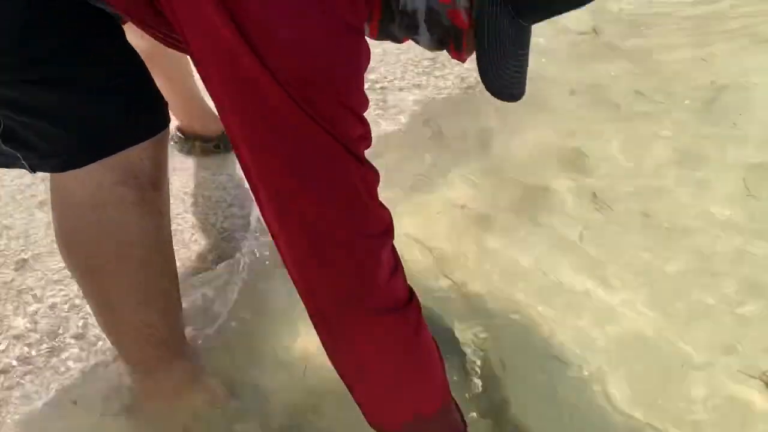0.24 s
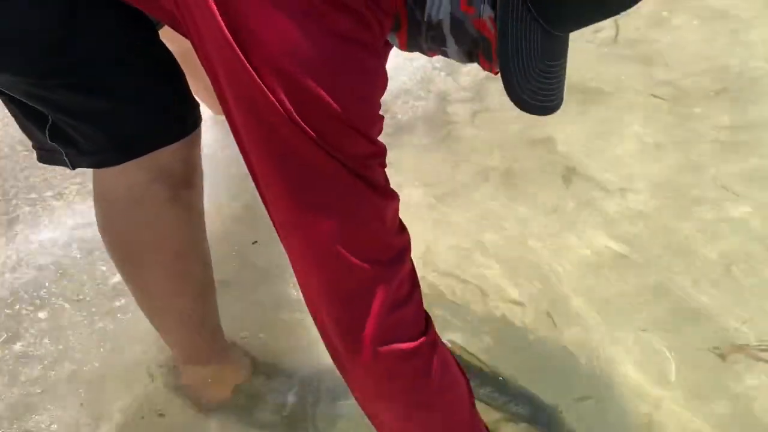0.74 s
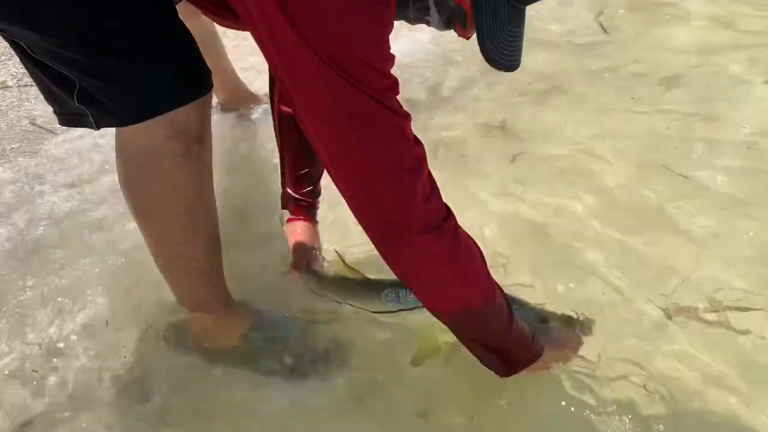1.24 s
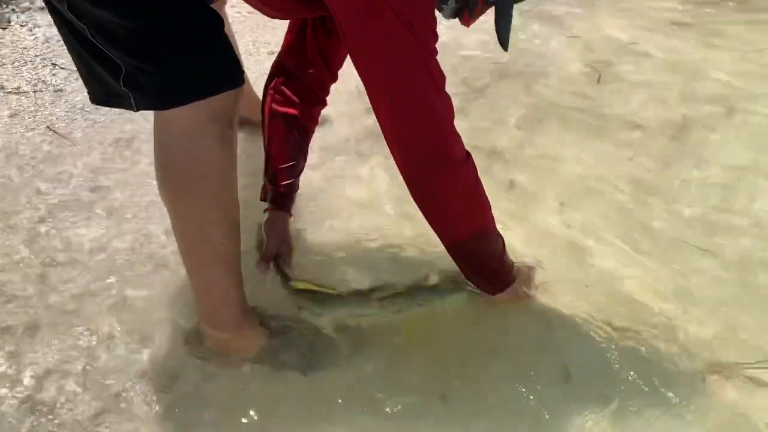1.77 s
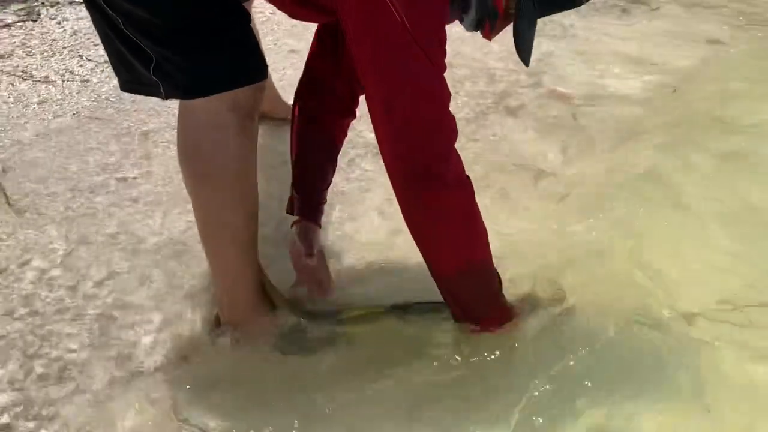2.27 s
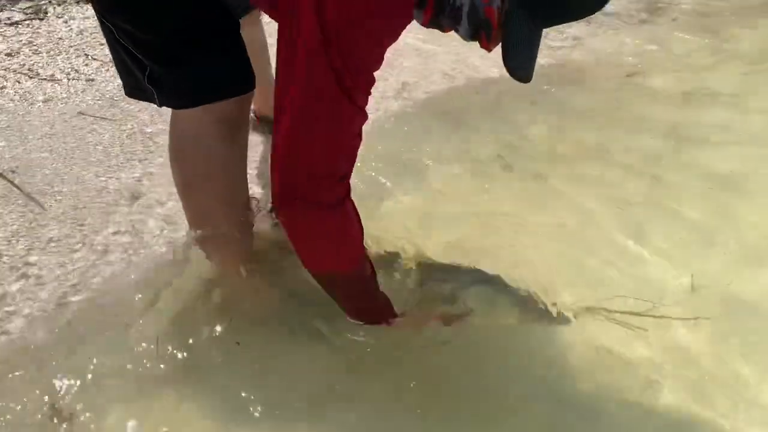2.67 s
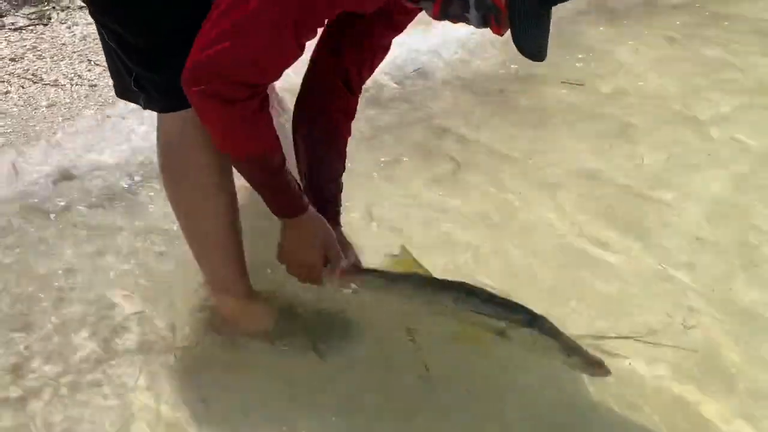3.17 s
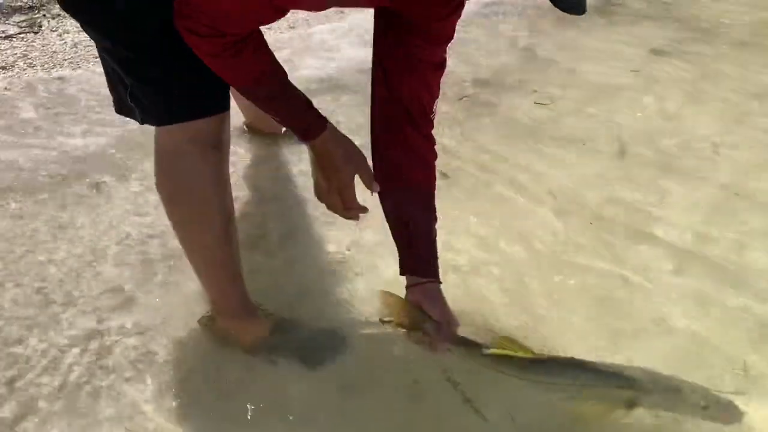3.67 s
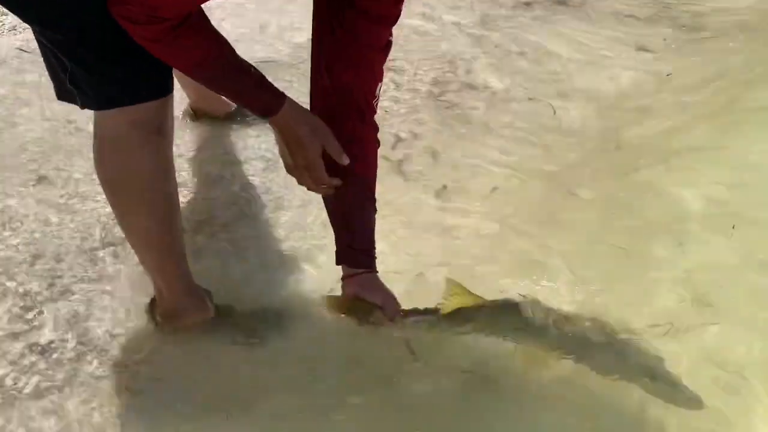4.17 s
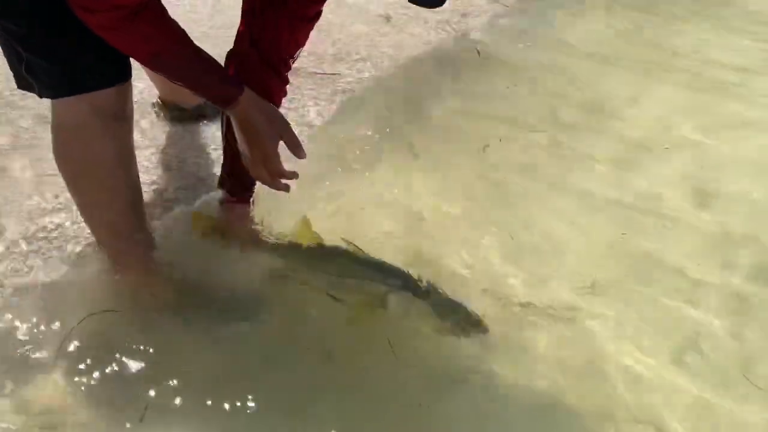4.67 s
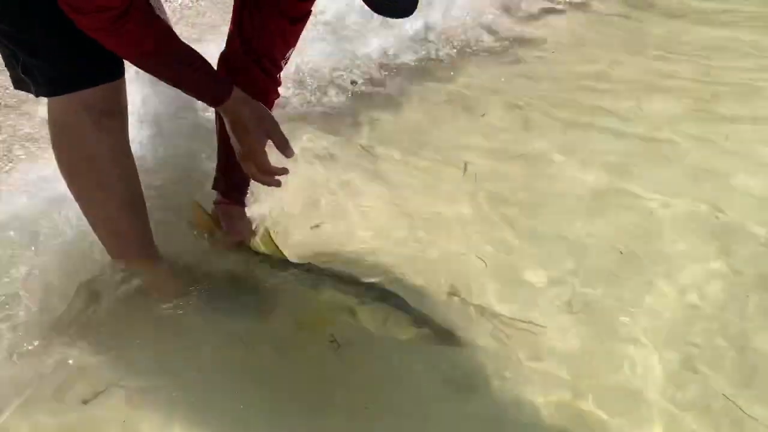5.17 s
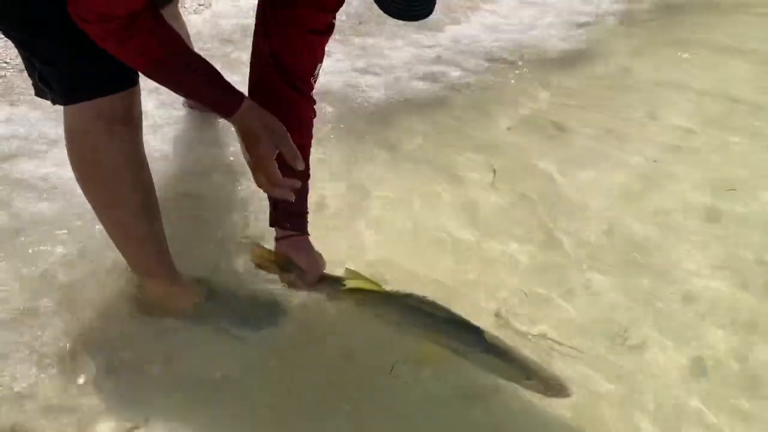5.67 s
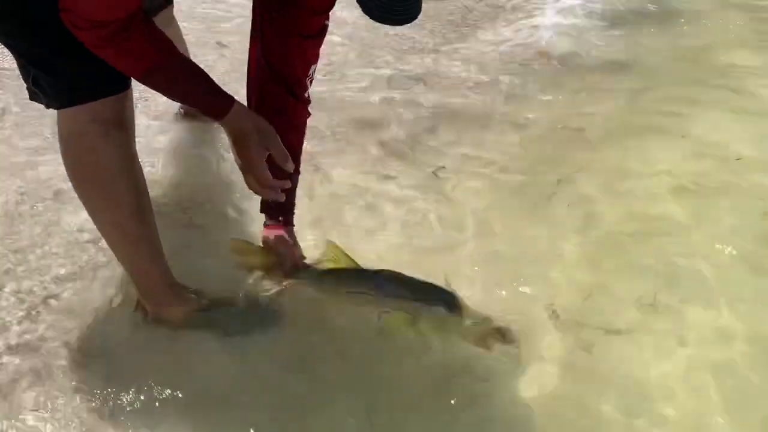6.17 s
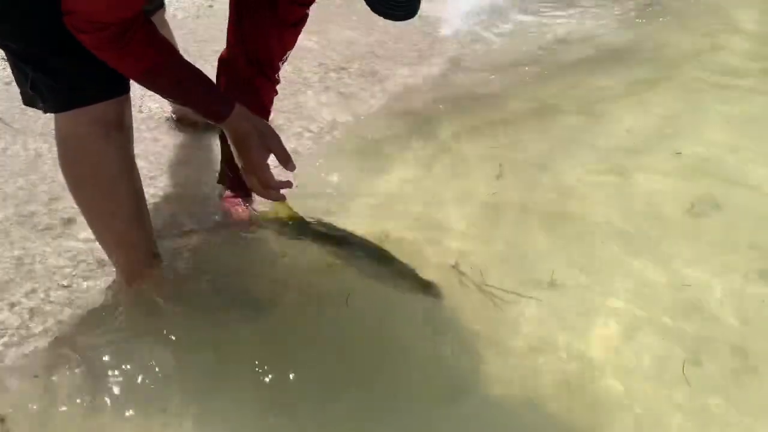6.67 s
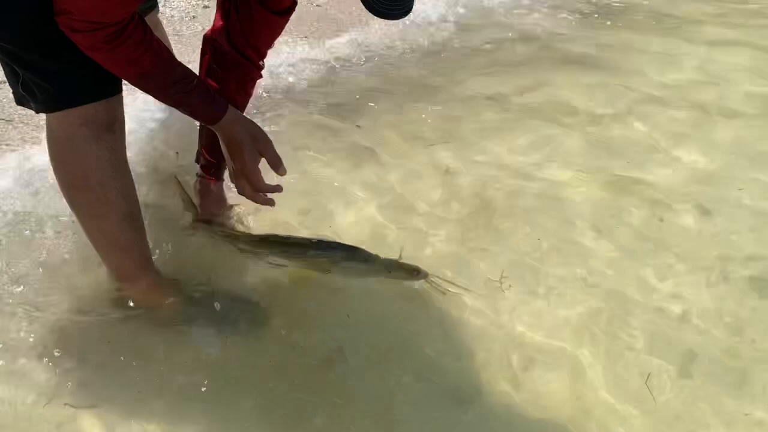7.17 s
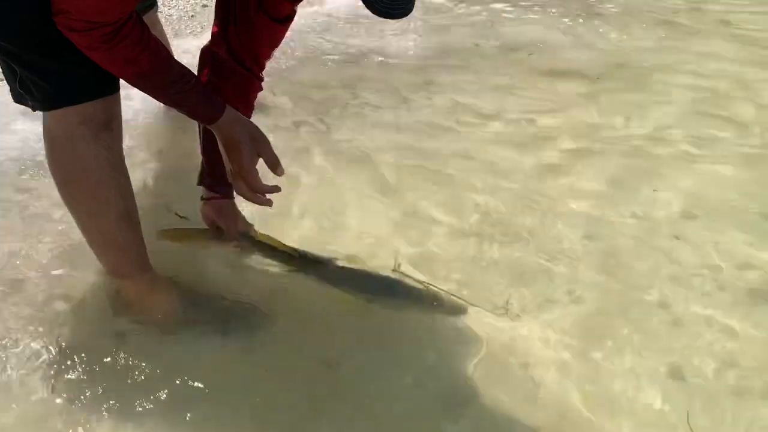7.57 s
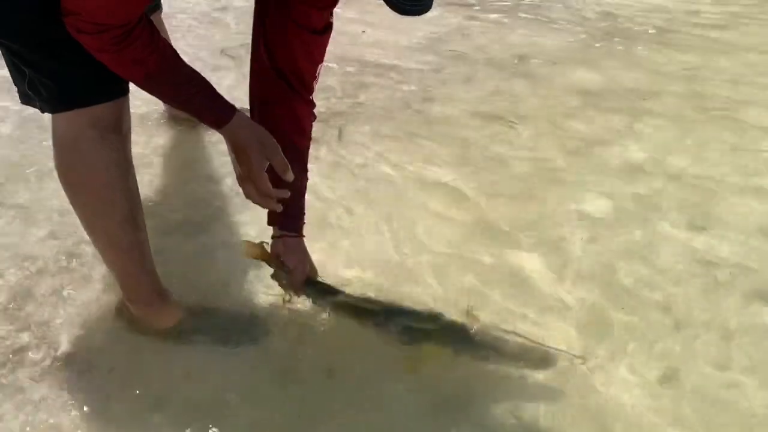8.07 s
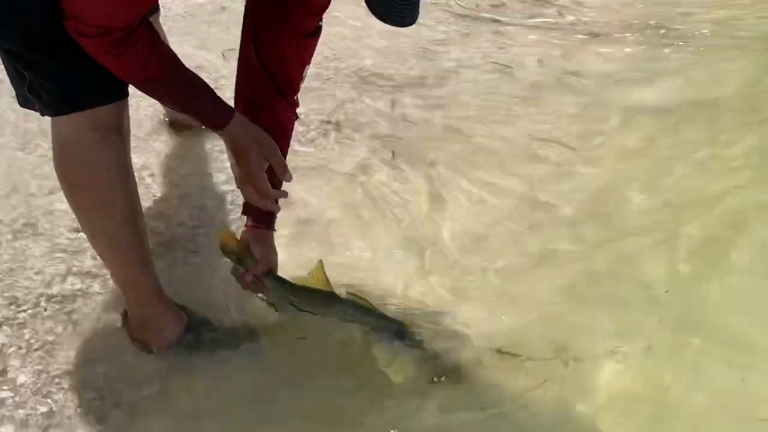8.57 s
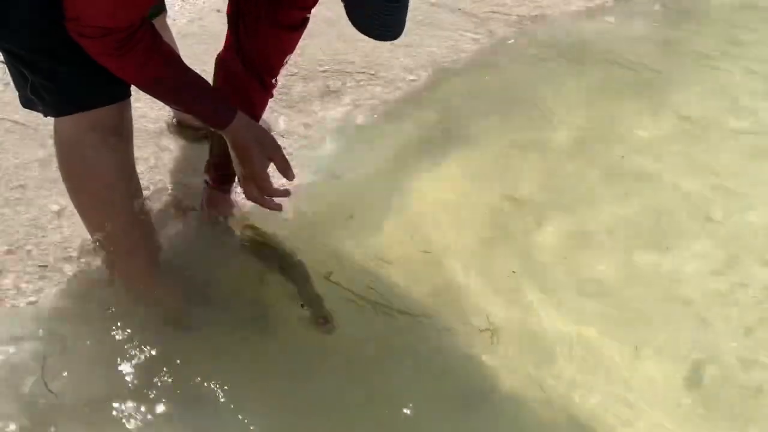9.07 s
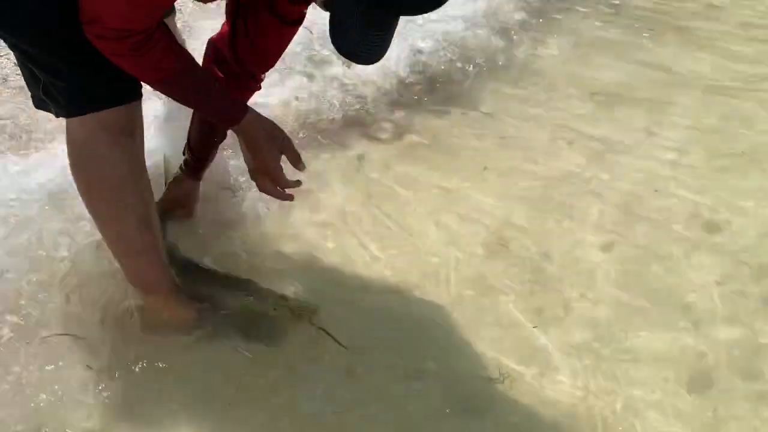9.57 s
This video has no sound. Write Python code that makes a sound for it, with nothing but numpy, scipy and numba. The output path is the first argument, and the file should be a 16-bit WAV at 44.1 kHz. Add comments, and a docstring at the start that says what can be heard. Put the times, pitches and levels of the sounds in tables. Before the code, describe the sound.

Small waves fold, gurgle and fizz up a sandy shore, sliding back in trickles, with low wind buffeting and a faint far motor hum.

```python
"""A sandy beach, heard from ankle-deep water: a far motor hums as a wavering sine over a drone. More surf along
the shore and wind on the microphone are coloured noise with random levels. Small waves fold over, wash up the
sand to the left, fizz as foam and slide back: clouds of ringing bubbles, the foam with added hiss. Single
bubbles plink and glug, drops tick, small waves slap a leg, water stirred by a moving arm sounds in narrow
bubbly bands that drift down in pitch."""
import sys
import numpy as np
from scipy import signal
from scipy.fft import rfft, irfft, next_fast_len
from scipy.io import wavfile
from scipy.ndimage import uniform_filter1d, map_coordinates
from numba import njit

SR = 44100
rng = np.random.default_rng(int(sys.argv[2]) if len(sys.argv) > 2 else 0)


def log_audio(samples):
    """Write samples as a 16-bit WAV file to the path given in sys.argv[1]."""
    # one column per channel
    frames = np.atleast_2d(samples).T
    # limit to full scale, then quantise
    limited = np.clip(frames, -1, 1)
    pcm = np.round(limited * 32767).astype(np.int16)
    wavfile.write(sys.argv[1], SR, pcm)


N = 433944
TIME = np.arange(N) / SR
FFT_SIZE = next_fast_len(N, True)
FREQ = np.fft.rfftfreq(FFT_SIZE, 1 / SR)
PORT_LAG_S = 13 / SR  # left channel late, for foam and drop splats


def undb(db):
    """Decibels to gain."""
    return 10 ** (np.asarray(db) / 20)


def together(*levels_db):
    """Power sum of unrelated sounds, in dB."""
    return 10 * np.log10(sum(undb(db) ** 2 for db in levels_db))


def swells(rows):
    """Level in dB of bell-shaped swells, each given as (middle s, half length s, dB)."""
    levels_db = [-100]
    for middle_s, half_s, db in rows:
        levels_db.append(db - 10 * np.log10(np.e) * ((TIME - middle_s) / half_s) ** 2)
    return together(*levels_db)


def surges(rows):
    """Level in dB of surges that rise evenly, hold and die away: (start s, rise s, hold s, decay s, dB)."""
    power = 1e-10
    for start_s, rise_s, hold_s, decay_s, db in rows:
        age_s = TIME - start_s
        attack = np.clip(age_s / rise_s, 0, 1)
        decay = np.exp(-np.maximum(age_s - rise_s - hold_s, 0) / decay_s)
        power = power + (undb(db) * attack * decay) ** 2
    return 10 * np.log10(power)


def curves(table):
    """Table columns joined by straight lines in time."""
    s, *columns = np.transpose(table)
    return [np.interp(TIME, s, column) for column in columns]


def walk(rate_hz):
    """Random levels held 1 / rate_hz seconds and slewed twice; spread near 1."""
    hold = int(SR / rate_hz)
    steps = np.repeat(rng.standard_normal(N // hold + 1), hold)
    smooth = uniform_filter1d(uniform_filter1d(steps, hold), hold)
    return np.sqrt(2) * smooth[:N]


def unit(x):
    """Scale to rms 1."""
    return x / np.sqrt(np.mean(x ** 2))


def noise(side_db):
    """White stereo noise at rms 1; side_db sets its width."""
    mid, side = rng.standard_normal((2, N))
    return unit(mid + undb(side_db) * side * np.array([[1], [-1]]))


def pan(db):
    """Channel gains for a left minus right level, steady or moving."""
    return undb(np.reshape([db, -db], (2, -1)) / 2)


def colour(x, points, lag_s=0):
    """Filter two channels by a spectrum curve and scale to rms 1; the left one comes lag_s late."""
    hz, db = np.transpose(points)
    spectrum = rfft(x, FFT_SIZE) * undb(np.interp(np.log(FREQ + 1), np.log(hz), db))
    if lag_s:
        spectrum[0] *= np.exp(-2j * np.pi * FREQ * lag_s)
    return unit(irfft(spectrum, FFT_SIZE)[:, :N])


@njit
def ring(start_s, hz, cycles, size, lag_s, glide):
    """Damped sines whose pitch rises by the share glide; each reaches the right channel lag_s late."""
    out = np.zeros((2, N))
    for k in range(len(start_s)):
        length = int(cycles[k] * SR / hz[k]) + 2
        turn = 2 * np.pi * hz[k] / SR
        bend = np.exp(1j * turn * glide / length)
        for c in range(2):
            first = max(int((start_s[k] + c * lag_s[k]) * SR), 0)
            z = size[k] + 0j
            step = np.exp(1j * turn - 5 / length)
            for i in range(first, min(first + length, N)):
                out[c, i] += z.imag
                z *= step
                step *= bend
    return out


PATCHES_PER_S, PATCHES_PER_OCTAVE = 22, 6


def patchiness(seconds, hz):
    """Random patchiness of bubble strength over time and pitch; spread near 1."""
    grid = rng.standard_normal((512, 128))
    place = [seconds * PATCHES_PER_S, np.log2(hz) * PATCHES_PER_OCTAVE]
    return map_coordinates(grid, place, order=1, mode="wrap") * 1.5


def bubbles(count, lo_hz, hi_hz, cycles, spread_db, lag_ms, scatter_ms, glide, patch_db=0):
    """Bubbles of many sizes, equally strong per Hz, scattered around a direction that may move; rms 1."""
    when, pitch, life, strength, place = rng.random((count, 5)).T
    start_s = when * N / SR
    hz = lo_hz + (hi_hz - lo_hz) * pitch
    size_db = patch_db * patchiness(start_s, hz) - spread_db * np.log(strength + 0.012)
    index = (when * N).astype(int)
    centre_ms = np.broadcast_to(lag_ms, N)[index]
    reach_ms = np.broadcast_to(scatter_ms, N)[index]
    lag_s = (centre_ms + reach_ms * (2 * place - 1)) / 1000
    return unit(ring(start_s, hz, cycles * (.5 + life), np.sqrt(hz) * undb(size_db), lag_s, float(glide)))


def swarm(rows, octaves, cycles, spread_db, lag_ms, scatter_ms, octaves_per_s, count):
    """Bubbles crowd around a moment and a pitch, for each (middle s, half length s, Hz, dB at the middle)."""
    out = 0
    for middle_s, half_s, hz, db in rows:
        when, pitch, strength, place = np.clip(rng.standard_normal((count, 4)).T, -2.5, 2.5)
        late_s = when * half_s / np.sqrt(2)
        octave = octaves * pitch + octaves_per_s * late_s
        size = undb(spread_db * np.minimum(strength, 1))
        lag_s = (lag_ms + scatter_ms * place) / 1000
        life = cycles * (.5 + rng.random(count))
        cloud = ring(middle_s + late_s, hz * 2 ** octave, life, size, lag_s, 0.16)
        share = np.mean(np.exp(-((TIME - middle_s) / half_s) ** 2))  # of the scene filled by the swarm
        out = out + unit(cloud) * undb(db) * np.sqrt(share)
    return out


# Far motor. Each row: time in seconds, pitch in Hz before wavering, relative level in dB.
MOTOR_NOTE = [(0, 138, -32), (.5, 151, -48), (.85, 129, -33), (1.08, 132, -33.5), (1.35, 143, -35.5),
              (2.15, 140, -58), (2.38, 139, -32), (2.6, 136, -36), (3.1, 137, -38.5), (3.95, 146, -46.5),
              (4.2, 143, -34), (4.5, 135, -38), (5.25, 128, -42), (5.6, 121, -33), (6.05, 123, -50),
              (6.55, 134, -36.5), (7.05, 133, -41), (8.25, 148, -51), (8.62, 145, -36.5), (9.05, 149, -45),
              (9.84, 135, -35)]


def motor():
    """A far motor: a sine whose pitch wavers with the load, over a faint drone near 75 Hz."""
    hz, db = curves(MOTOR_NOTE)
    phase = 2 * np.pi * np.cumsum(hz * (1 + 0.0241 * walk(22))) / SR
    right_lead_rad = np.array([[0], [.5]])
    note = np.sin(phase + right_lead_rad) * undb(db + 1.0 + 2.0 * walk(11))
    drone_phase = 2 * np.pi * np.cumsum(75 * (1 + 0.0155 * walk(6.3))) / SR
    drone = np.sin(drone_phase) * undb(-44.0 + 2 * walk(1.4))
    return note + drone


# Surf spectrum. Each row: frequency in Hz, relative density in dB per Hz.
SURF_SPECTRUM = [(80, 4), (160, 1), (300, 3), (420, -2.5), (560, 2.5), (730, -14), (850, -4), (950, 3.5),
                 (1130, -1.5), (1450, -1.5), (1900, -4.5), (2400, -12), (4000, -42), (8000, -78)]


def surf():
    """Wavelets further along the shore to the right merge into wide, soft, hollow noise."""
    rush = colour(noise(side_db=-4.0), SURF_SPECTRUM, lag_s=0.00028)
    return rush * undb(-39.5 + 0.36 * walk(1.06) + 1.0 * walk(9.9))


BREEZE_DB = -34  # relative, as the gusts
# Gusts over the breeze. Each row: middle in seconds, half length in seconds, relative level in dB.
GUST_SWELLS = [(.3, 0.29, -33.5), (1.86, 0.052, -29), (2.3, 0.18, -36), (4.33, 0.15, -35),
               (5.88, 0.11, -33), (8.03, 0.13, -35), (9.33, 0.21, -30.5)]
# Single eddies striking the microphone. Each row: start in seconds, relative peak in dB.
EDDIES = [(0.189, -26), (1.672, -23), (1.822, -22), (3.475, -27.5), (3.868, -24), (4.372, -23.5),
          (4.785, -20), (5.028, -21), (5.12, -22), (6.5, -29), (7.031, -20), (7.409, -19.5), (7.548, -22),
          (9.08, -19), (9.15, -20), (9.233, -15), (9.558, -19)]
# Wind spectrum. Each row: frequency in Hz, relative density in dB per Hz.
WIND_SPECTRUM = [(20, -38), (35, -23), (52, -4), (72, -2), (120, -1), (200, -5.5), (300, -14.5),
                 (600, -21.5), (1500, -72)]


def wind():
    """Turbulence rumbles on the microphone: low noise that swells with gusts and briefly with each eddy."""
    wind_db = together(BREEZE_DB, swells(GUST_SWELLS))
    steady = undb(wind_db - 1.1 + 1.36 * walk(15))
    eddies = 0
    for start_s, peak_db in EDDIES:
        age = np.clip((TIME - start_s) / 0.013, 0, 20)  # peaks at 1, 13 ms after the start
        eddies = eddies + undb(peak_db - 3.0) * age * np.exp(1 - age)
    return colour(noise(side_db=-19.5), WIND_SPECTRUM) * pan(-2.0) * np.hypot(steady, eddies)


def trickle(wash_db):
    """Ripples around the legs release soft bubbles in uneven runs, louder as a wave passes."""
    cloud = bubbles(count=2400, lo_hz=715, hi_hz=4424, cycles=63, spread_db=1,
                    lag_ms=-0.087, scatter_ms=0.28, glide=0.07)
    return cloud * undb(-15.5 + 0.89 * wash_db + 1.3 * walk(8.8))


# Drops falling back on the water. Each row: start in seconds, relative splat level in dB,
# bubble pitch in Hz, relative bubble level in dB.
DROP_TICKS = [(0.153, -36, 3030, -32.5), (0.2154, -33, 2440, -40), (0.7128, -23, 2570, -41),
              (1.2395, -42, 3200, -33), (1.8294, -41, 3630, -39), (2.4887, -40, 2640, -40),
              (3.1568, -22, 2450, -28), (4.346, -36, 2280, -56), (4.6414, -45, 2600, -39),
              (5.3148, -29, 2960, -38), (6.9267, -29, 2340, -48), (8.4257, -38, 4070, -54),
              (8.642, -37, 2320, -52), (9.645, -22, 2500, -22)]


def drops():
    """A drop splats as a decaying burst of high noise and leaves a tiny ringing bubble."""
    start_s, splat_db, hz, bubble_db = np.transpose(DROP_TICKS)
    age_s = np.arange(int(.012 * SR)) / SR
    splats = np.zeros(N)
    for first, db in zip((start_s * SR).astype(int), splat_db):
        burst = np.exp(-age_s / 0.0033) * rng.standard_normal(len(age_s))
        splats[first:first + len(age_s)] += undb(db + 3.0) * burst
    splats = signal.sosfilt(signal.butter(2, 7000, "high", fs=SR, output="sos"), splats)
    cycles = np.full(len(start_s), 42.)
    bubble = ring(start_s + 0.00183, hz, cycles, undb(bubble_db - 0.5), 0 * start_s, 0.063)
    return np.array([np.roll(splats, round(PORT_LAG_S * SR)), splats]) + bubble


# Single bubbles nearby. Each row: start in seconds, pitch in Hz, relative level in dB.
LONE_BUBBLES = [(1.187, 2650, -34), (1.254, 4380, -39), (1.318, 3580, -43), (1.355, 2680, -46),
                (1.411, 2730, -40), (2.072, 3110, -35), (2.096, 2080, -32), (2.798, 2790, -33),
                (3.622, 2500, -38), (5.509, 2560, -38), (5.790, 2980, -33), (6.214, 3470, -39),
                (6.419, 1710, -41), (6.431, 2560, -38), (6.519, 3580, -32), (6.670, 2160, -43),
                (6.687, 2850, -29), (6.725, 1820, -44), (7.484, 1960, -29), (8.067, 2700, -37),
                (8.745, 3240, -41)]


def plinks():
    """A lone bubble rings briefly and rises a little in pitch."""
    start_s, hz, db = np.transpose(LONE_BUBBLES)
    lag_s = rng.uniform(-0.00017, 0.00029, len(start_s))
    return ring(start_s, hz, np.full(len(start_s), 48.), undb(db + 1.0), lag_s, 0.058)


BAND_OCTAVES, BAND_OCTAVES_PER_S = 0.122, -0.37  # pitch spread and drift
# Water stirred by a moving arm. Each row: middle in seconds, half length in seconds, # middle band pitch in Hz,
# level in dB.
STIR_BANDS = [(1.46, 0.066, 1440, -49), (2.2, 0.17, 3030, -45.5), (2.27, 0.25, 2010, -54),
              (2.33, 0.041, 1140, -38.5), (2.45, 0.028, 1460, -41), (2.55, 0.14, 2770, -50),
              (2.75, 0.15, 2300, -44), (5.51, 0.019, 2950, -53), (5.68, 0.17, 2730, -65),
              (6.03, 0.076, 1260, -43), (6.45, 0.036, 2200, -47), (6.69, 0.057, 2780, -47.5),
              (8.3, 0.23, 1340, -50.5)]


def stirs():
    """Narrow bands of bubbly sound that drift slowly down in pitch, as an arm stirs the water nearby."""
    return swarm(STIR_BANDS, BAND_OCTAVES, cycles=38, spread_db=1, lag_ms=0, scatter_ms=0.11,
                 octaves_per_s=BAND_OCTAVES_PER_S, count=200)


# Small waves slapping a leg. Each row: start in seconds, relative peak in dB.
LEG_SLAPS = [(1.687, -24.5), (1.888, -21.5), (1.907, -22), (5.189, -26), (6.768, -29), (9.154, -24),
             (9.269, -20)]


def slaps():
    """A slap shuts in six pockets of air within 4 ms; they ring from 400 to 1520 Hz, the higher the softer."""
    start_s, db = np.repeat(np.transpose(LEG_SLAPS), repeats=6, axis=1)
    pitch = np.tile(np.linspace(0, 1, 6), len(LEG_SLAPS))
    late_s = 0.0039 * rng.random(len(start_s))
    size = undb(db - 1.0 - 5 * pitch)
    return ring(start_s + late_s, 400 * 3.8 ** pitch, np.full(len(start_s), 5.5), size, 0 * start_s, 0.15)


# Thin sheets of water on the sand. Each row: middle in seconds, half length in seconds,
# middle bubble pitch in Hz, level in dB before panning.
SHEET_SWARMS = [(.72, .11, 1730, -41), (4.48, .04, 2740, -45), (4.57, 0.063, 2300, -37),
                (4.84, 0.085, 2210, -36), (4.82, 0.088, 4200, -37), (7.3, 0.21, 1710, -38.5),
                (7.72, .15, 1694, -43), (8.94, 0.09, 1690, -42), (9.12, .05, 2800, -35.5),
                (9.4, 0.17, 1750, -33.5), (9.78, 0.21, 1600, -34.5), (9.68, 0.18, 5900, -41)]


def sheets():
    """A thin sheet of water seethes up the sand to the left: swarms of small bubbles."""
    seethe = swarm(SHEET_SWARMS, octaves=0.413, cycles=38, spread_db=5, lag_ms=0.4, scatter_ms=.04,
                   octaves_per_s=0, count=500)
    return seethe * pan(1)


# Crests breaking on the sand. Each row: middle in seconds, half length in seconds,
# middle bubble pitch in Hz, level in dB before panning.
BREAK_SWARMS = [(.63, 0.099, 888, -29.5), (1.88, .045, 714, -35.5), (2.29, .13, 636, -34.5),
                (3.05, 0.13, 980, -39), (4.78, 0.061, 703, -25), (4.88, 0.035, 698, -25.5),
                (5.13, .11, 837, -28), (7.17, 0.19, 955, -32.5), (9.13, 0.044, 650, -38),
                (9.28, .1, 730, -26.5), (9.48, 0.084, 780, -33)]


def breaks():
    """A crest breaks on the sand to the left into coarse bubbles of many sizes."""
    crash = swarm(BREAK_SWARMS, octaves=0.663, cycles=16.6, spread_db=3, lag_ms=0.34, scatter_ms=0.058,
                  octaves_per_s=0, count=450)
    return crash * pan(5.2)


GLUG_CYCLES, GLUG_GLIDE = 21., 0.28  # ring length, share by which the pitch rises
# Air pockets closing under a folding crest. Each row: start in seconds, pitch in Hz, relative peak in dB.
AIR_POCKETS = [(.600, 490, -28), (.637, 368, -20), (.647, 635, -23), (1.487, 357, -24), (1.830, 473, -24),
               (1.866, 520, -24), (1.888, 755, -24), (1.903, 373, -21), (2.999, 630, -23),
               (3.634, 272, -23), (3.696, 348, -21), (3.722, 620, -23), (4.732, 490, -24),
               (4.748, 267, -19), (4.760, 580, -21), (4.773, 375, -20), (4.848, 746, -19),
               (4.854, 496, -15), (4.974, 567, -13), (5.057, 535, -18), (5.103, 410, -18),
               (5.118, 292, -20), (5.161, 590, -27), (5.191, 635, -14), (6.768, 576, -23),
               (7.578, 580, -21), (7.804, 900, -20), (9.153, 644, -16), (9.242, 485, -23),
               (9.269, 820, -16), (9.437, 760, -17), (9.484, 367, -15), (9.570, 245, -17),
               (9.659, 624, -12)]


def glugs():
    """A large pocket of air rings and rises in pitch as it nears the surface."""
    start_s, hz, db = np.transpose(AIR_POCKETS)
    count = len(start_s)
    pockets = ring(start_s, hz, np.full(count, GLUG_CYCLES), undb(db - 1.5), np.full(count, .0002), GLUG_GLIDE)
    return pockets * pan(1.8)


RIPPLE_WASH_DB, RIPPLE_FOAM_DB = -54, -51  # ripples that never stop, relative
# Waves running up the sand. Each row: start in seconds, rise in seconds, hold in seconds,
# decay time in seconds, relative wash level in dB, relative foam level in dB.
RUN_UPS = [(0.207, 0.24, 0.23, 0.19, -37, -41.5), (1.843, 0.18, 0.31, 0.4, -46, -51),
           (2.4, 0.58, 0.2, 0.43, -39, -42), (4.387, 0.27, 0.27, 0.2, -34.5, -37.5),
           (4.943, 0.18, 0.084, 0.2, -38.5, -36), (6.668, 0.28, 0.37, 0.47, -38.5, -41.5),
           (8.956, 0.21, 0.32, 0.52, -31, -35.5)]
# Water sliding back between waves. Each row: middle in seconds, half length in seconds,
# relative wash level in dB, relative foam level in dB.
DRAININGS = [(0.102, 0.33, -48, -60), (1.475, 0.34, -48.5, -51.5), (1.885, 0.065, -44, -43.5),
             (3.726, 0.31, -46.5, -45.5), (5.6, 0.17, -49.5, -51), (6.022, 0.18, -44, -41.5),
             (6.554, 0.23, -50.5, -50.5), (7.788, 0.13, -48.5, -47.5), (8.911, 0.12, -45.5, -46)]


def flow():
    """Levels in dB of the water running up, the water draining and the foam on both."""
    *wave, wave_wash_db, wave_foam_db = np.transpose(RUN_UPS)
    *back, back_wash_db, back_foam_db = np.transpose(DRAININGS)
    run_up_db = surges(zip(*wave, wave_wash_db))
    drain_db = together(RIPPLE_WASH_DB, swells(zip(*back, back_wash_db)))
    wave_foam = surges(zip(*wave, wave_foam_db))
    back_foam = swells(zip(*back, back_foam_db))
    return run_up_db, drain_db, together(RIPPLE_FOAM_DB, wave_foam, back_foam)


# (lead of the left channel, scatter): waves land left, drain right
LANDING_MS, DRAINING_MS = (.485, 0.027), (-0.18, 0.17)
TURN_AT_DB, TURN_WIDTH_DB = 3, 2  # run-up over draining water where the sound swings left
CHURN_SCATTER_MS = 0.16


def bearing(excess_db):
    """The direction follows the stronger flow and spreads out where the two meet."""
    left = .5 + .5 * np.tanh((excess_db - TURN_AT_DB) / (2 * TURN_WIDTH_DB))
    lag_ms, scatter_ms = (left * a + (1 - left) * b for a, b in zip(LANDING_MS, DRAINING_MS))
    return lag_ms, scatter_ms + CHURN_SCATTER_MS * np.sin(np.pi * left)


# Foam spectrum. Each row: frequency in Hz, relative density in dB per Hz.
FOAM_SPECTRUM = [(2500, -13), (4500, 1), (6500, -5.5), (8500, 3.5), (10500, 2), (13500, 3.5), (15200, -5),
                 (16000, -23)]


def foam(db):
    """Tiny bubbles burst on the wet sand over nearly mono hiss, slightly later on the left."""
    fizz = bubbles(count=70000, lo_hz=2980, hi_hz=15600, cycles=3.1, spread_db=2.5,
                   lag_ms=0, scatter_ms=0.0025, glide=.05, patch_db=1.5)
    hiss = noise(side_db=-48.5)
    treble = colour(fizz + undb(-0.5) * hiss, FOAM_SPECTRUM, PORT_LAG_S)
    return treble * undb(db - 1.0 + 1.25 * walk(60))


# Wash spectrum. Each row: frequency in Hz, relative density in dB per Hz.
WASH_SPECTRUM = [(150, -0.5), (350, -6), (650, 2.5), (1100, -2.5), (1600, -6.5), (2300, -4), (3200, -6.5),
                 (4100, -8), (6000, -10.5), (9000, -14)]


def wash(db, lag_ms, scatter_ms):
    """Water tumbles over the sand: bubbles of many sizes from the flow's moving direction, others all around."""
    front = bubbles(count=70000, lo_hz=176.0, hi_hz=8010, cycles=21.6, spread_db=-0.5,
                    lag_ms=lag_ms, scatter_ms=scatter_ms, glide=0.2, patch_db=2.5)
    around = bubbles(count=30000, lo_hz=494, hi_hz=7970, cycles=28.7, spread_db=0.5,
                     lag_ms=0, scatter_ms=.55, glide=0.13, patch_db=2.5)
    tumble = colour(front + undb(-2.0) * around, WASH_SPECTRUM)
    return tumble * pan(0.86 * lag_ms) * undb(db + 5.0 + .5 * walk(35))


RIPPLE_GURGLE_DB, GURGLE_IN_WASH_DB = -43.5, -1.5  # ripples, relative; running water, over its wash level
PAN_DB_PER_MS = 3  # the channel that leads is also louder
# Crests folding over. Each row: middle in seconds, half length in seconds, relative level in dB.
FOLD_SWELLS = [(.62, 0.2, -35), (1.48, 0.055, -33), (1.86, 0.097, -32.5), (2.2, 0.23, -35),
               (3.08, 0.18, -31.5), (3.68, 0.13, -29), (4.02, 0.16, -35.5), (4.78, 0.044, -31),
               (5.11, 0.14, -23.5), (5.93, 0.29, -33), (7.08, 0.24, -36.5), (7.55, 0.082, -34),
               (7.78, 0.14, -31), (9.19, 0.17, -33.5), (9.58, 0.15, -27)]
# Gurgle spectrum. Each row: frequency in Hz, relative density in dB per Hz.
GURGLE_SPECTRUM = [(100, -15.5), (215, 3), (320, -4), (400, 2), (480, -3.5), (630, 1), (750, -6.5),
                   (850, -4), (940, -3.5), (1120, -15.5), (1260, -8), (1600, -20), (4000, -41)]


def gurgle(wash_db, lag_ms):
    """The crest folds over nearly straight ahead and traps large pockets of air, with a hollow colour."""
    fold_db = together(RIPPLE_GURGLE_DB, wash_db + GURGLE_IN_WASH_DB, swells(FOLD_SWELLS)) + .5 * walk(14)
    cloud = bubbles(count=20000, lo_hz=129.4, hi_hz=2597, cycles=16.9, spread_db=1.45,
                    lag_ms=0.31 * lag_ms, scatter_ms=0.15, glide=0.12)
    hollow = colour(cloud, GURGLE_SPECTRUM) * pan(1.2 + PAN_DB_PER_MS * lag_ms)
    return hollow * undb(fold_db - 0.5 + 0.67 * walk(28))


def scene():
    """Distance, wind, water around the legs and waves, summed."""
    run_up_db, drain_db, foam_db = flow()
    wash_db = together(run_up_db, drain_db)
    lag_ms, scatter_ms = bearing(run_up_db - drain_db)
    background = motor() + surf() + wind()
    near_water = trickle(wash_db) + drops() + plinks() + stirs() + slaps()
    crests = sheets() + breaks() + glugs()
    waves = foam(foam_db) + wash(wash_db, lag_ms, scatter_ms) + gurgle(wash_db, lag_ms)
    return background + near_water + crests + waves


TOP_HZ = 15750


def record(dry):
    """The recorder cuts the deepest rumble and, steeply, the top."""
    dry = signal.sosfilt(signal.butter(3, 32, "high", fs=SR, output="sos"), dry)
    return signal.sosfilt(signal.ellip(10, .2, 80, TOP_HZ, fs=SR, output="sos"), dry)


dry = scene()
out = record(dry)
log_audio(out)
```